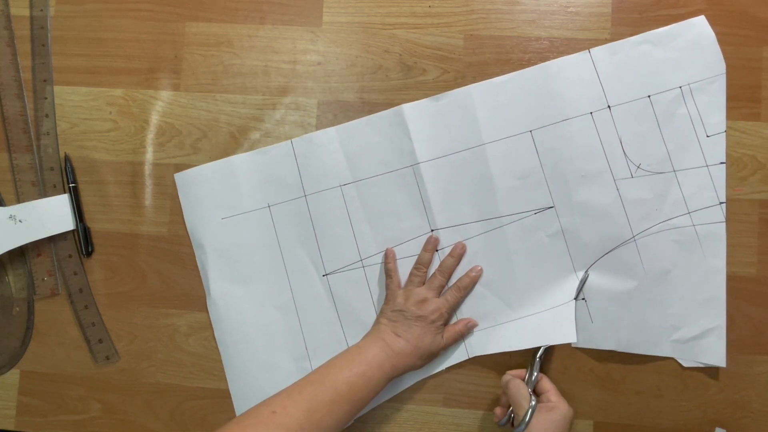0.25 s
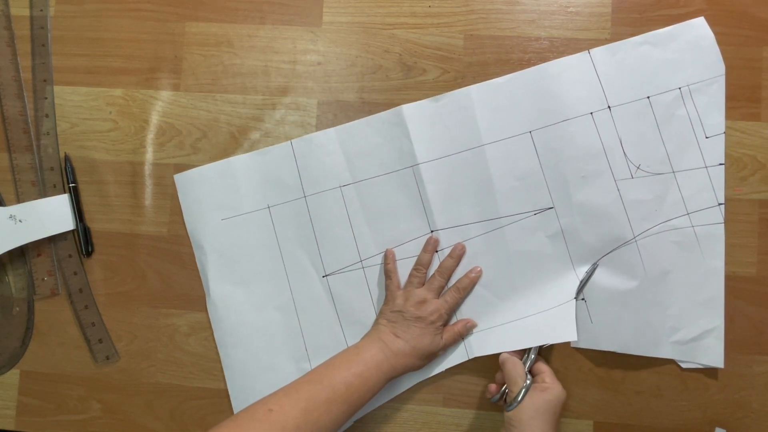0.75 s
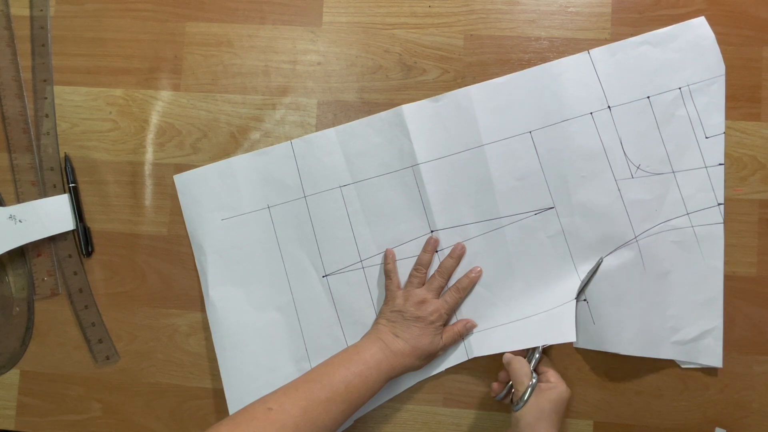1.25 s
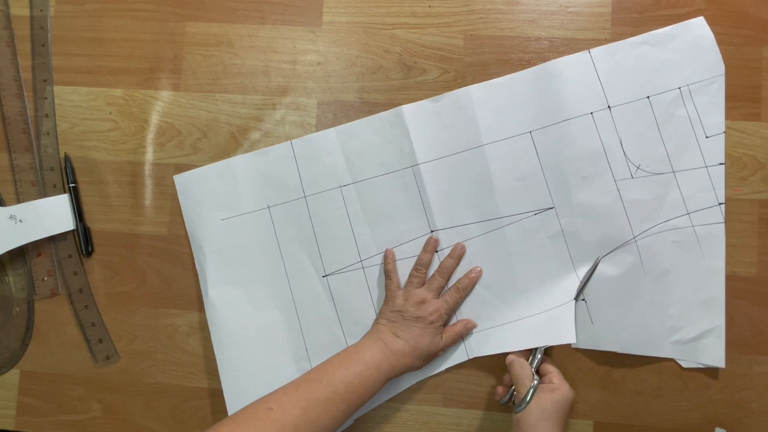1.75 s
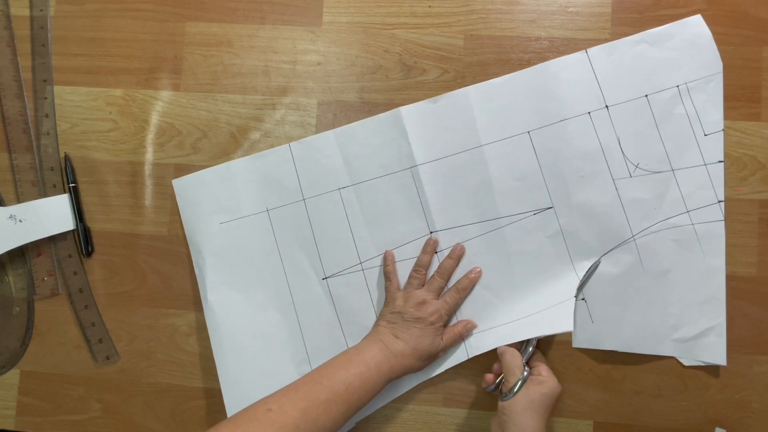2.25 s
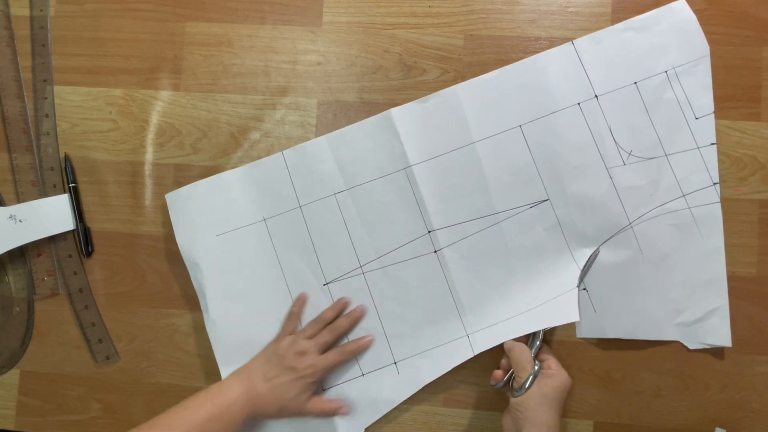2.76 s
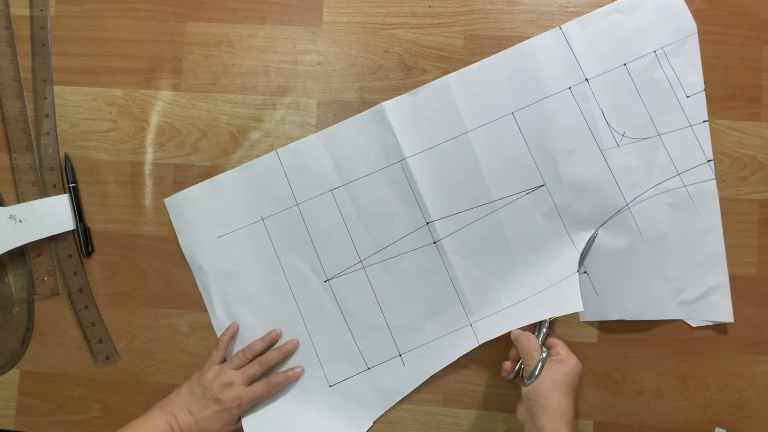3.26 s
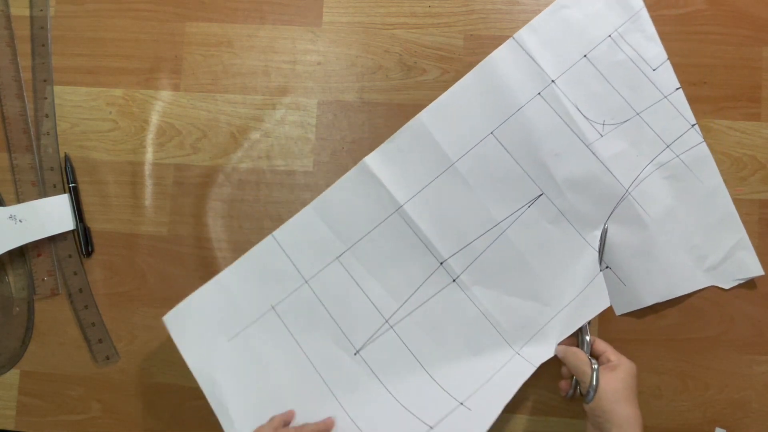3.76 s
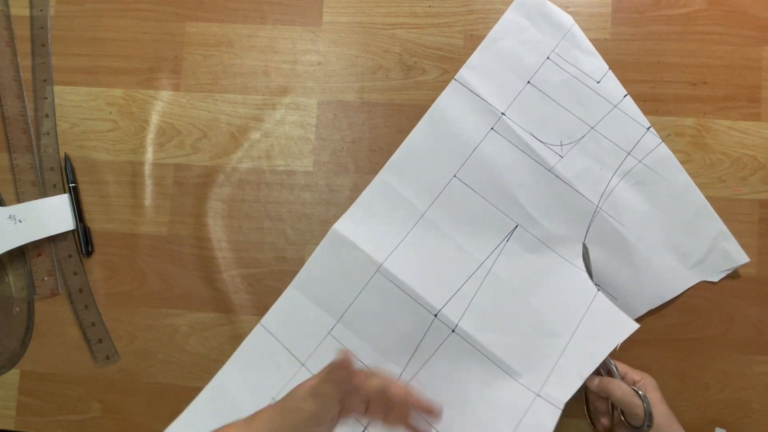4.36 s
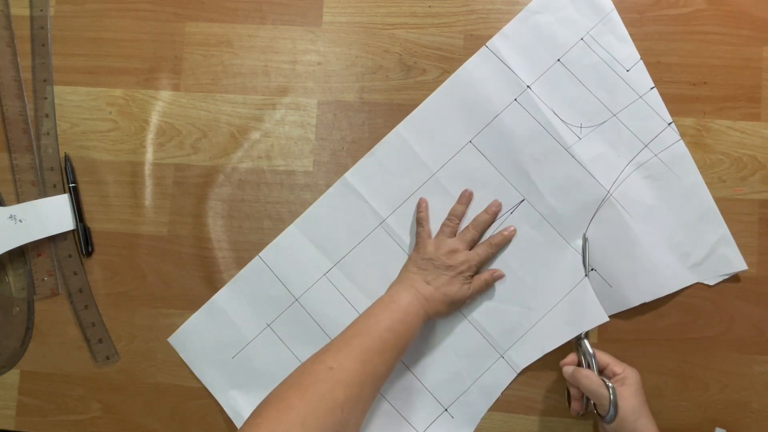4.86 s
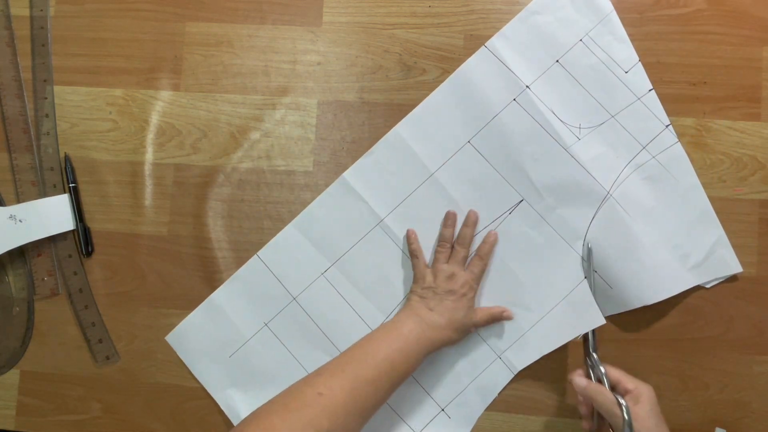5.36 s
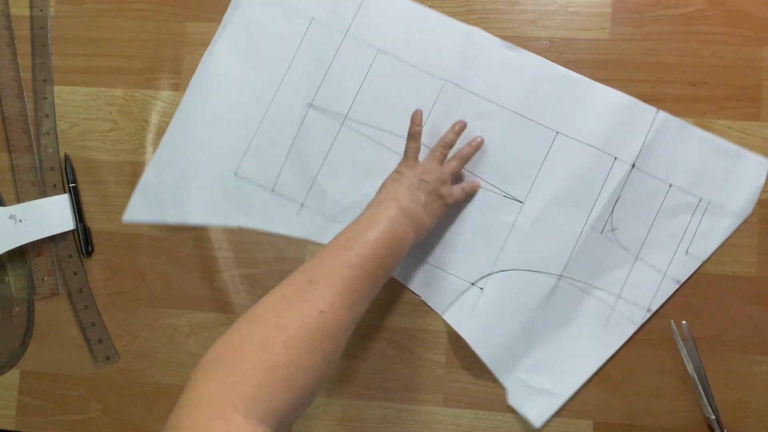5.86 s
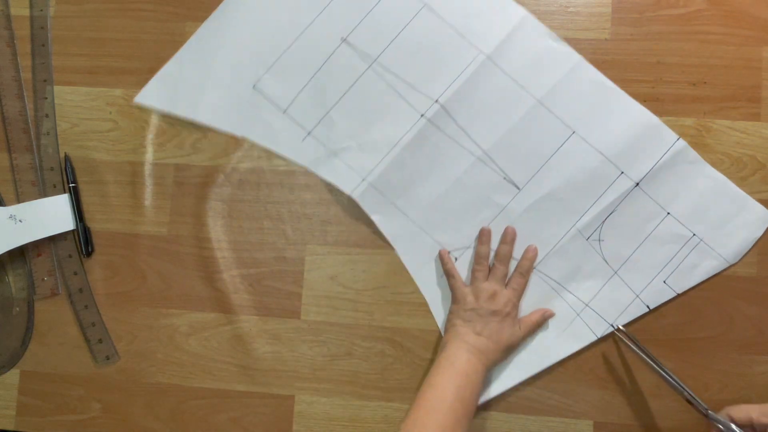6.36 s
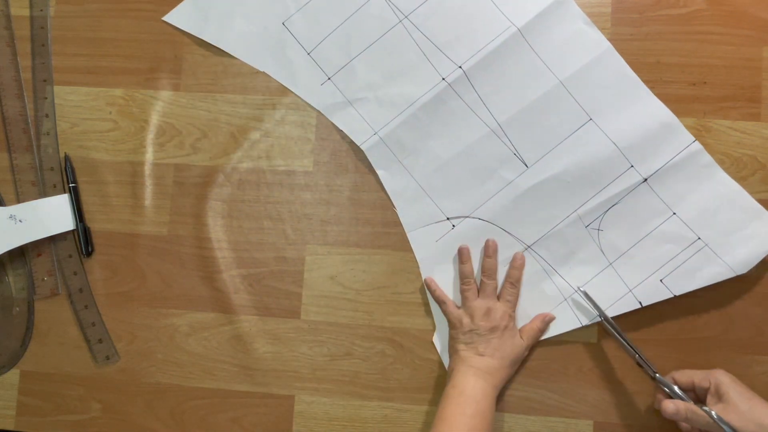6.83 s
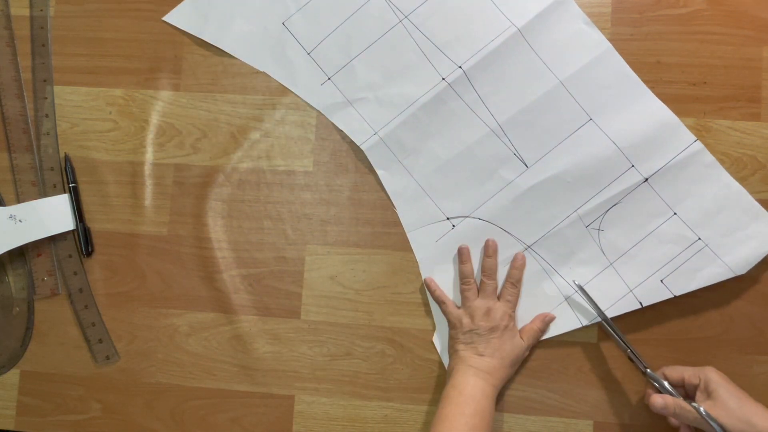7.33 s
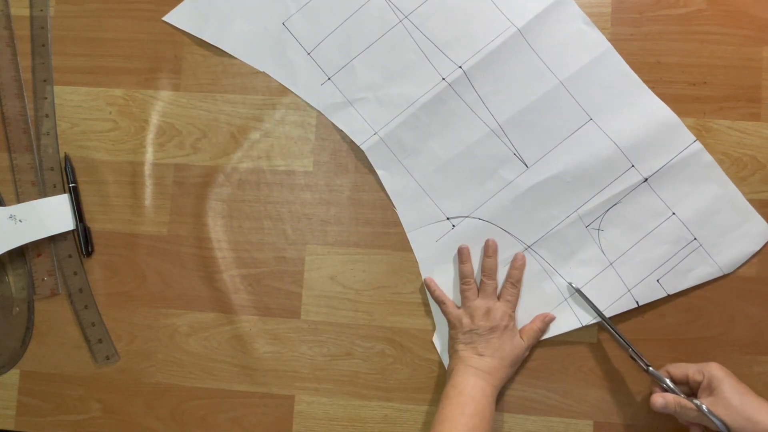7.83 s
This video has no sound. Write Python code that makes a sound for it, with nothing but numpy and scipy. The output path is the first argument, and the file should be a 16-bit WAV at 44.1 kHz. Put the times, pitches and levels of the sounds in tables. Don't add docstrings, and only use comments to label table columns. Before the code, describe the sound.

Small scissor snips, sharp creasing snaps and sliding hiss of big paper on wooden boards, a few soft palm pats, low indoor hum.

```python
import sys
import numpy as np
from scipy import signal
from scipy.fft import rfft, irfft, next_fast_len
from scipy.io import wavfile
from scipy.ndimage import map_coordinates

SR = 44100
rng = np.random.default_rng(int(sys.argv[2]) if len(sys.argv) > 2 else 0)


def amplitude_ratio(level_db):
    exponent = np.asarray(level_db, float) / 20
    return 10 ** exponent


def store_wav(level_fs):
    pcm = np.round(np.clip(np.atleast_2d(level_fs), -1, 1) * 32767)
    wavfile.write(sys.argv[1], SR, pcm.T.astype(np.int16))


N = 356769


def unit(x):
    return x / np.sqrt(np.mean(x ** 2) + 1e-20)


def along(points, hz):
    f, *cols = np.transpose(points)
    return np.squeeze([np.interp(np.log(hz + 1), np.log(f + 1), c) for c in cols])


def curves(rows):
    s, *cols = np.transpose(rows)
    return [np.interp(np.arange(N) / SR, s, c) for c in cols]


def wobble(rate):
    knots = rng.standard_normal(int(N * rate / SR) + 4)
    return map_coordinates(knots, [np.arange(N) * rate / SR])


def filtered(x, response):
    m = next_fast_len(x.shape[-1] + 4096)
    spectrum = rfft(x, m) * response(np.fft.rfftfreq(m, 1 / SR))
    return irfft(spectrum, m)[..., :x.shape[-1]]


def coloured(points):
    return lambda hz: amplitude_ratio(along(points, hz))


def ringing(modes):
    def response(f):
        total = 0
        for k, (centre, width, db) in enumerate(modes):
            mode = 1j * f * width / (centre * centre - f * f + 1j * f * width)
            total = total + (-1) ** k * amplitude_ratio(db) * mode
        return total
    return response


def steep(modes):
    return lambda f: ringing(modes)(f) ** 2


def grit(response, grain_db=0, rate=1):
    grain = amplitude_ratio(grain_db * wobble(rate))
    return unit(filtered(rng.standard_normal((2, N)) * grain, response))


def burst(t60, grain_db, rise=.0005, hold=0, size=SR // 10):
    t = np.arange(size) / SR
    grain = np.repeat(rng.standard_normal(len(t) // 30 + 1), 30)[:len(t)]
    decay = amplitude_ratio(-60 * np.maximum(t - rise - hold, 0) / max(t60, .003))
    swell = np.minimum(t / max(rise, 1e-4), 1) * decay
    return rng.standard_normal((2, len(t))) * amplitude_ratio(grain_db * grain) * swell


def add(out, s, x, db):
    out[:, round(s * SR):][:, :x.shape[1]] += x * amplitude_ratio(db) / np.max(np.abs(x[0]))


def swells(rows, rest_db):
    roundness = 1.6
    t = np.arange(0, N + 64, 64) / SR
    power = amplitude_ratio(2 * rest_db)
    for s, db, rise, fall in rows:
        distance = np.maximum((s - t) / max(rise, .005), (t - s) / max(fall, .005))
        power = power + amplitude_ratio(2 * (db - 20 * distance ** roundness))
    return np.interp(np.arange(N) / SR, t, np.sqrt(power))


# t/s, peak level/dB, board knock level/dB
BITES = [(0.0386, -41.5, -50.5), (0.0704, -46.5, -49), (0.635, -45, -52), (0.668, -44, -50),
         (0.6725, -39, -48), (0.6828, -53, -52), (0.7067, -43, -48), (0.7315, -37.5, -54),
         (0.8005, -45.5, -54), (0.8465, -39, -48), (1.812, -58, -74), (1.914, -55, -58),
         (1.9235, -31, -47.5), (1.9334, -56, -44.5), (2.0358, -51, -46), (2.066, -52, -58),
         (2.1844, -46, -60), (2.2584, -40, -50), (2.317, -51, -56), (6.214, -45, -55), (7.522, -48.5, -51),
         (7.603, -49.5, -44.5), (7.6864, -43, -47), (7.7245, -49.5, -45), (7.7516, -51, -45),
         (7.7902, -44, -53), (7.8317, -44.5, -43.5), (7.874, -40, -47), (7.9344, -41, -40),
         (7.9994, -49.5, -49.5)]
# f/Hz, width/Hz, level/dB
STEEL = [(1440, 97, -2), (2690, 600, -1.5), (4940, 870, -1), (6370, 1800, -0.5), (9500, 9000, -6),
         (14000, 13500, -7.5)]
# f/Hz, width/Hz, level/dB
BOARD = [(259.5, 53, -2.5), (336, 37, 1), (383, 34.6, -1.5), (659, 42, -8.5), (880, 94, -13.5),
         (1290, 74, -14.5)]


def bites():
    out = np.zeros((2, N + SR))
    for s, db, knock_db in BITES:
        cut = burst(0.021, grain_db=3.0, rise=0.0011, hold=.005)
        add(out, s - .0005, filtered(cut, ringing(STEEL)), db + 1.0)
        knock = burst(0.019, grain_db=6.5)
        add(out, s, filtered(knock, ringing(BOARD[:4])), knock_db + 5)
    return out[:, :N]


# t/s, peak level/dB, panel f/Hz, bright share level/dB
TURN_SNAPS = [(2.192, -44, 3500, -15), (2.21, -45, 1100, -1), (2.593, -44.5, 1430, -26),
              (2.682, -35.5, 1820, -28), (2.721, -36, 1480, -22), (2.728, -32, 2160, -27),
              (2.797, -33.5, 1900, -16), (2.8085, -30, 1980, -7.5), (2.919, -43, 2530, -25),
              (3.167, -35, 2190, -18), (3.185, -27.5, 2520, -10), (3.305, -29.5, 2140, -10),
              (3.335, -40, 2000, -16), (3.443, -33, 2110, -5.5), (3.461, -33, 2580, -2),
              (3.511, -35, 832, -20), (3.542, -39, 2250, -18), (3.56, -41, 1810, -15),
              (3.58, -43, 1690, -17), (3.607, -36.5, 1400, -9), (3.643, -38, 1670, -22),
              (3.723, -34, 1290, -11.5), (3.842, -38, 1130, -23), (3.893, -41, 1570, -18.5)]
# t/s, peak level/dB, panel f/Hz, bright level/dB
LIFT_SNAPS = [(3.989, -42.5, 855, -13), (4.023, -39, 1630, -19), (4.034, -38, 1710, -8),
              (4.045, -22, 1600, -8.5), (4.198, -41, 2020, -26), (4.218, -32, 2060, -33),
              (4.24, -31, 1060, -33), (4.309, -33, 2000, -24), (4.346, -42, 810, -24),
              (4.389, -33, 1200, -23), (4.585, -47, 1940, -18), (4.597, -33, 2460, -27),
              (4.601, -35, 1300, -27), (4.611, -25, 2280, -24), (4.619, -20, 2100, -7.5),
              (4.6235, -24, 2200, -15), (4.63, -27, 2500, -31), (4.95, -48, 1630, -2),
              (5.158, -47.5, 2130, -5), (5.254, -39.5, 1570, -18), (5.377, -31, 1900, -24),
              (5.384, -32, 1980, -20), (5.39, -27.5, 2560, -9), (6.213, -41, 1800, -8)]
USUAL_SNAP_DB = -35
# f/Hz, level/dB per Hz
BRIGHT = [(1500, -33), (3500, 6), (5500, 13.5), (7500, 1), (12000, -18), (16000, -29)]


def snaps():
    out = np.zeros((2, N + SR))
    rise = .0018
    for s, db, hz, bright_db in TURN_SNAPS + LIFT_SNAPS:
        t60 = .029 + .0004 * (db - USUAL_SNAP_DB)
        panel = ringing([(hz, 0.4 * hz, 0), (1.43 * hz, 1.22 * hz, -6), (0.57 * hz, 0.45 * hz, -8.5)])
        add(out, s, filtered(burst(t60, grain_db=2.0, rise=rise), panel), db + 1.0)
        spray = burst(0.58 * t60, grain_db=-1.0, rise=rise)
        add(out, s, filtered(spray, coloured(BRIGHT)), db + bright_db + 3)
    return out[:, :N]


def damped_ring(hz, t60):
    t = np.arange(SR // 10) / SR
    overtone = amplitude_ratio(-7 - 60 * t / t60) * np.sin(2 * np.pi * 1.37 * hz * t)
    ring = np.sin(2 * np.pi * hz * t) + overtone
    onset = 1 - np.exp(-t / .0007)
    return (ring * onset * amplitude_ratio(-60 * t / t60))[None]


# t/s, peak level/dB, f/Hz
TICKS = [(0.039, -51, 5170), (0.673, -47, 1720), (0.731, -47, 5340), (0.732, -51, 3960), (0.803, -51, 5340),
         (0.852, -45, 5000), (1.925, -40, 4650), (2.194, -51, 4650), (2.197, -50, 3450), (2.209, -46, 2760),
         (2.225, -47, 2760), (2.511, -51, 2410), (2.524, -47, 2580), (2.683, -48, 4130), (2.81, -35, 5340),
         (3.169, -48, 5860), (3.383, -41, 2240), (3.388, -49, 4480), (3.461, -37, 2760), (3.479, -45, 3620),
         (3.511, -38, 2930), (3.543, -50, 4480), (3.644, -42, 2580), (3.722, -50, 5680), (4.056, -33, 690),
         (4.175, -51, 5170), (4.24, -38, 2580), (4.387, -49, 3100), (4.485, -51, 4820), (4.485, -49, 2580),
         (5.378, -30, 1890), (5.394, -38, 5170), (5.653, -45, 2240), (5.663, -39, 5170), (5.67, -39, 5000),
         (5.701, -39, 6030), (5.799, -41, 4310), (5.823, -42, 5860), (6.213, -43, 3960), (6.229, -50, 3960),
         (6.231, -44, 1720), (6.393, -48, 1550), (6.742, -51, 1890), (7.79, -50, 2070), (7.838, -50, 2580),
         (0.6715, -46, 1100), (0.706, -50, 1000), (0.7315, -49, 1300), (0.846, -48, 1100),
          (0.856, -50, 1000), (1.9255, -42, 900), (3.56, -39, 1800), (3.579, -42, 1200), (3.587, -41, 1700),
          (3.598, -41, 1900), (3.656, -43, 1500), (3.684, -45, 1300), (4.217, -35, 1300),
          (4.221, -34, 2200), (4.2235, -37, 1000), (4.289, -42, 1320), (4.308, -38, 3300),
          (4.312, -37, 1500), (4.3145, -39, 2700), (4.388, -39, 2000), (4.392, -39, 900),
          (4.597, -36, 2500), (4.631, -28, 2240), (4.645, -36, 2300), (4.653, -39, 1550),
          (5.164, -51, 5300), (7.934, -45, 1300), (7.935, -47, 3500)]


def ticks():
    out = np.zeros((2, N + SR))
    for s, db, hz in TICKS:
        t60 = .014 * np.sqrt(1800 / hz)
        add(out[:1], s, damped_ring(hz, t60), db)
    return out[:, :N]


# t/s, peak level/dB, f/Hz, t60/s
RINGS = [(0.639, -48, 1000, .02), (1.932, -44, 1450, .05), (2.039, -47, 900, .03), (7.527, -50, 1300, .04),
         (7.603, -48, 1300, .05), (7.686, -49, 1300, .04), (7.727, -49, 900, .05), (7.789, -50, 1150, .03),
         (7.876, -43, 1280, .05), (7.893, -46, 900, .04), (7.945, -43, 930, .1), (7.968, -48, 860, .06),
         (8.003, -50, 800, .04)]


def board_rings():
    out = np.zeros((2, N + SR))
    for s, db, hz, t60 in RINGS:
        add(out[:1], s, damped_ring(hz, t60), db)
    return out[:, :N]


# t/s, peak level/dB, t60/s
PATS = [
    (2.781, -44, 0.18),
    (4.659, -45.5, 0.06),
    (6.295, -34, 0.055),
    (6.329, -39.5, 0.086),
    (6.38, -37, 0.077),
    (6.419, -47, 0.07),
    (6.485, -39, 0.12),
    (6.519, -42, 0.14),
]
# f/Hz, width/Hz, level/dB
PALM = [(199, 51, -2), (312, 69, 3.5), (495, 600, -3), (800, 600, -6.5)]


def pats():
    out = np.zeros((2, N + SR))
    soft = lambda f: ringing(PALM)(f) / (1 + 1j * f / 900) ** 2
    for s, db, t60 in PATS:
        add(out, s, filtered(burst(t60, grain_db=0.5, size=SR // 4), soft), db)
    puff = burst(.12, grain_db=0, rise=0.01, size=SR // 4)
    add(out, 4.63, filtered(puff, ringing([(45, 44, 0)])), -40)
    return out[:, :N]


# t/s fastest, level/dB, last 20 dB rise/s, 20 dB fall/s
SLIDES = [(0.05, -79.0, 0.12, 0.16), (0.35, -61.5, 0.17, 0.16), (1.16, -68.5, 0.1, 0.11),
          (2.22, -67.0, 0.06, 0.09), (2.59, -67.5, 0.48, 0.26), (2.73, -61.5, 0.1, 0.16),
          (2.84, -60.5, 0.15, 0.11), (2.96, -63.0, 0.08, 0.22), (3.19, -58.5, 0.05, 0.07),
          (3.34, -60.5, 0.13, 0.17), (3.45, -61.5, 0.2, 0.06), (3.61, -68.5, 0.35, 0.37),
          (4.03, -62.0, 0.41, 0.12), (4.17, -58.5, 0.05, 0.13), (4.37, -70.5, 0.05, 0.17),
          (4.48, -63.0, 0.09, 0.22), (4.62, -57.0, 0.04, 0.18), (4.98, -70.0, 0.17, 0.09),
          (5.35, -67.5, 0.55, 0.26), (5.56, -59.0, 0.38, 0.28), (5.7, -52.5, 0.25, 0.3),
          (5.93, -59.5, 0.38, 0.13), (6.24, -70.5, 0.02, 0.13), (6.4, -55.0, 0.15, 0.17),
          (6.73, -69.0, 0.1, 0.15), (7.52, -79.0, 0.03, 0.1), (7.86, -85.0, 0.38, 0.3)]
# f/Hz, level/dB per Hz
SLIDE = [(600, -39), (1400, -13), (2200, -6), (3000, -4), (4000, -4), (6000, 0), (7500, -6), (10000, -7),
         (13000, -16), (15600, -12)]


def slide():
    skids = [(s, db - 38, .012, .1) for s, db, _ in BITES]
    hiss = grit(coloured(SLIDE), grain_db=1.0, rate=470)
    return swells(SLIDES + skids, -87.5) * amplitude_ratio(9 + 1.5 * wobble(25)) * hiss


def crackle(rate, centre_hz, spread, cycles, size_db):
    when, place, pitch, size = rng.random((int(rate) * N // SR, 4)).T
    hz = centre_hz * np.exp(spread * (2 * pitch - 1))[:, None]
    t = np.arange(SR // 100) / SR
    peak = amplitude_ratio(-size_db * np.log(1 - np.minimum(size, .96)))[:, None]
    rings = peak * np.sin(2 * np.pi * hz * t) * np.exp(-t * hz / cycles)
    at = ((when * N).astype(int)[:, None] + np.arange(len(t))).ravel()
    sides = np.cos(2 * np.pi * place), np.sin(2 * np.pi * place)
    return unit(np.array([np.bincount(at, (rings * side[:, None]).ravel(), N + SR)[:N] for side in sides]))


# f/Hz, level/dB per Hz
FLEX = [(250, -17), (600, 3.5), (1000, -3.5), (1600, -4), (2200, 0.5), (3000, -2), (4500, -10.5),
        (8000, -21), (16000, -75)]


def rustling():
    creases = crackle(1300, centre_hz=1600, spread=0.79, cycles=2.2, size_db=2.5)
    return amplitude_ratio(-2.5) * grit(coloured(FLEX), grain_db=1.0, rate=500) + amplitude_ratio(-3.5) * creases


# t/s tightest, level/dB, last 20 dB rise/s, 20 dB fall/s
BENDS = [(0, -57.0, 0.1, 0.13), (3.37, -49.5, 0.09, 0.39), (3.51, -46.0, 0.28, 0.39),
         (3.61, -46.5, 0.15, 0.13), (3.84, -49.0, 0.05, 0.27), (4.05, -41, 0.1, 0.09),
         (4.23, -46, 0.14, 0.06), (4.3, -48.0, 0.06, 0.06), (4.39, -48.0, 0.05, 0.07),
         (4.63, -45.5, 0.1, 0.06), (6.37, -65.5, 0.34, 0.51), (7.81, -59.0, 1.47, 0.81)]


def flex(rustle):
    hits = TURN_SNAPS + LIFT_SNAPS + BITES
    shakes = [(s, -56 + .45 * (db - USUAL_SNAP_DB), .012, .08) for s, db, *_ in hits]
    return swells(BENDS + shakes, -68) * amplitude_ratio(-3.0 + 1.9 * wobble(60)) * rustle


# t/s widest, level/dB, last 20 dB rise/s, 20 dB fall/s
FLAPS = [
    (0.35, -66, .1, .1),
    (2.8, -56, .03, .08),
    (3.42, -57, .06, .05),
    (3.485, -55, .04, .03),
    (4.09, -52, .05, .12),
    (4.2, -55, .08, .1),
    (4.33, -54, .06, .08),
    (4.41, -55, .04, .1),
    (4.53, -60, .06, .06),
]
# f/Hz, width/Hz, level/dB
LOOSE = [(800, 450, 0)]


def flap(rustle):
    return swells(FLAPS, -87) * unit(filtered(rustle, steep(LOOSE)))


# t/s fastest, level/dB, last 20 dB rise/s, 20 dB fall/s
FIZZES = [
    (1.927, -58, .005, .03),
    (2.75, -68, .4, .4),
    (5.75, -69, .4, .3),
    (6.4, -72, .2, .2),
]
# f/Hz, width/Hz, level/dB
DRY = [(15200, 1200, 0)]


def fizz(rustle):
    response = lambda f: steep(DRY)(f) / coloured(FLEX)(f)
    return swells(FIZZES, -105) * unit(filtered(rustle, response))


# t/s fastest, level/dB, last 20 dB rise/s, 20 dB fall/s
BRUSHES = [(0.36, -65, 0.14, 0.14), (1.15, -61.0, 0.08, 0.13), (2.23, -58.0, 0.08, 0.06),
           (2.4, -64.0, 0.22, 0.24), (2.56, -63.0, 0.15, 0.2), (2.97, -59.5, 0.15, 0.23),
           (3.31, -60.0, 0.13, 0.29), (4.48, -62.0, 0.14, 0.25), (4.98, -69.5, 0.15, 0.19),
           (5.23, -68.0, 0.27, 0.21), (5.49, -59.5, 0.43, 0.35), (6.39, -67.5, 0.18, 0.28),
           (6.74, -65.5, 0.11, 0.13)]
# f/Hz, width/Hz, level/dB
TAUT = [(1700, 950, 0), (2700, 1200, 0.5)]
# t/s fastest, level/dB, last 20 dB rise/s, 20 dB fall/s
DRAGS = [(0.33, -64, .12, .1), (0.39, -61, .08, .1), (2.87, -66, .05, .08), (3.87, -62, .1, .1),
         (3.925, -58, .05, .04), (3.97, -58, .03, .06), (3.6, -60, .08, .1), (6.23, -60, .03, .06),
         (6.39, -65, .05, .05), (6.75, -65, .04, .06), (6.58, -68, .04, .04)]
# f/Hz, width/Hz, level/dB
SLACK = [(1500, 1100, 0)]
# t/s fastest, level/dB, last 20 dB rise/s, 20 dB fall/s
SCRAPES = [
    (2.52, -62, .04, .05),
    (2.875, -57, .04, .04),
    (2.925, -59, .03, .03),
    (2.965, -57, .05, .04),
    (3.39, -61, .03, .08),
    (4.18, -59, .06, .04),
]
# f/Hz, width/Hz, level/dB
TIGHT = [(2800, 1100, 0)]


def brush():
    uneven = amplitude_ratio(1.5 * wobble(30))
    rub = grit(steep(TAUT), grain_db=2.5, rate=300)
    taut = swells(BRUSHES, -87) * rub
    slack = swells(DRAGS, -87) * unit(filtered(rub, steep(SLACK)))
    tight = swells(SCRAPES, -87) * unit(filtered(rub, steep(TIGHT)))
    return uneven * (taut + slack + tight)


# t/s, level/dB, last 20 dB rise/s, 20 dB fall/s
WHISKS = [
    (5.68, -51, .06, .1),
    (5.82, -53, .12, .12),
    (6.39, -58, .15, .15),
    (2.4, -62, .15, .15),
]
# f/Hz, width/Hz, level/dB
EDGE = [(5200, 2200, 0), (3500, 900, -6), (7600, 1500, -8)]


def whisk():
    return swells(WHISKS, -87) * grit(steep(EDGE), grain_db=2.5, rate=200)


# t/s hardest, level/dB, last 20 dB rise/s, 20 dB fall/s
PRESSES = [
    (0, -48, .1, .22),
    (0.7, -63, 1.2, .6),
    (2.05, -63, 1.5, 1.5),
    (2.75, -55.5, .2, .8),
    (3.49, -56, .9, .6),
    (4.21, -54.5, .7, .65),
    (5.6, -61, 1.2, .9),
    (6.44, -54, .9, .3),
    (7.75, -52.5, .35, .8),
]


def press():
    return swells(PRESSES, -68) * amplitude_ratio(-2.0) * grit(ringing(BOARD), grain_db=3.5, rate=40)


def hand():
    rustle = rustling()
    paper = flex(rustle) + flap(rustle) + fizz(rustle)
    return slide() + paper + brush() + whisk() + press()


# f/Hz, t60/s
WALLS = [(200, 0.35), (2000, 0.21), (10000, 0.085)]


def walls(x):
    out, step = np.zeros((2, N + 2 * SR)), SR // 4
    for start in range(0, N, step):
        hz, t, z = signal.stft(rng.standard_normal((2, SR // 3)), SR, nperseg=256)
        decay = amplitude_ratio(-60 * t / along(WALLS, hz)[:, None])
        tail = signal.istft(z * decay, SR, nperseg=256)[1]
        echo = signal.fftconvolve(x[:, start:start + step], tail / np.linalg.norm(tail[0]), axes=1)
        out[:, start + SR // 200:][:, :echo.shape[1]] += echo
    return out[:, :N]


# t/s, rumble level/dB, drone level/dB
ROOM = [(0.0, -55, -57), (0.74, -80, -50.5), (1.04, -58, -71), (1.28, -64, -53), (2.23, -61, -59),
        (2.46, -54.5, -63), (2.9, -51, -51), (3.2, -48, -50), (3.42, -49, -54), (3.65, -49, -50),
        (3.92, -49, -54.5), (4.2, -50, -49), (4.87, -54, -49), (5.25, -55, -55), (5.55, -57, -49),
        (5.85, -57, -50.5), (6.15, -55, -47), (6.6, -55, -53), (7.86, -52, -53.5), (8.09, -53, -44)]
# f/Hz, rms level/dB
MAINS = [(100, -63.5), (150, -63), (200, -67), (249, -67.5), (400, -72.5)]
# f/Hz, width/Hz, level/dB
RUMBLE = [(57.2, 14.4, 5.5), (98, 27, -3)]
# f/Hz, width/Hz, level/dB
DRONE = [(146, 23.6, 0)]
# f/Hz, level/dB per Hz
AIR = [(18, -60), (26, 5), (170, -3), (350, -15), (500, -9), (1000, -12.5), (2000, -19.5), (3000, -18.5),
       (4000, -25), (6000, -27), (7100, -24.5), (10000, -62), (12500, -66), (13300, -95)]


def hum():
    rumble_db, drone_db = curves(ROOM)
    t = np.arange(N) / SR
    mains = 0
    for hz, db in MAINS:
        level = amplitude_ratio(db + 2.5 + 2.2 * wobble(2.91))
        mains = mains + level * np.sin(2 * np.pi * hz * t + 0.41 * wobble(3))
    boom = amplitude_ratio(rumble_db - 1.1) * grit(steep(RUMBLE)) + amplitude_ratio(drone_db - 2.0) * grit(steep(DRONE))
    air = amplitude_ratio(-55.5 + 0.2 * wobble(2.03)) * grit(coloured(AIR))
    return mains * [[1], [0]] + boom + air


# f/Hz, left lead/rad, likeness 0-1
TREBLE = [(6850, 2.9, .89), (8050, 3.4, .91), (8800, 5.8, .75), (9900, 6.2, .95), (12300, 6.3, .97),
          (13000, 9.2, .9), (15100, 9.5, .97), (15400, 10.7, .7)]
# f/Hz, left-right level/dB
LEAN = [(60, 0), (170, -3), (400, -4.5), (700, -2), (1500, 1), (3000, 2), (5000, -1), (6500, 0)]


def ports(pair, table):
    def left_right(hz):
        lead, alike = along(table + TREBLE, hz)
        turn = np.arccos(np.clip(alike, 0, 1)) / 2
        port = np.exp(.5j * lead) * amplitude_ratio(along(LEAN, hz) / 2)
        shared, own = np.cos(turn), np.sin(turn)
        return np.array([[shared * port, own * port], [shared / port, -own / port]])
    return filtered(pair[None], left_right).sum(axis=1)


# f/Hz, left lead/rad, likeness 0-1
NEAR = [(344, 0.39, .94), (520, 0.87, .65), (700, 1.4, 0.66), (1060, 0.73, 0.09), (1500, 0.019, 0.82),
        (2170, 0.47, 0.97), (2860, 1, 0.42), (4020, 0.7, .6), (5400, 0.86, 0.56), (6140, 1.9, 0)]
# f/Hz, left lead/rad, likeness 0-1
FAR = [(60, 0, .995), (177, 0, 0.98), (360, 1, 1), (523, 2, 0.72), (720, 2, 0.57), (1080, 2.5, 0.47),
       (1560, 1.5, .4), (2150, 1.5, 0.14), (2920, 2.5, 0.51), (3970, 3, 0.28), (5070, 0.2, 0.2),
       (5650, 1.1, 1)]


def scene():
    hits = bites() + snaps() + ticks() + board_rings() + pats()
    near = hits + hand() + amplitude_ratio(-9.5) * walls(hits)
    return ports(near, NEAR) + ports(hum(), FAR)


def roll_off(x):
    return signal.sosfilt(signal.butter(12, 17070, fs=SR, output="sos"), x)


def record(dry):
    mix = filtered(dry, lambda hz: hz < 15830)
    return roll_off(mix)


dry = scene()
out = record(dry)
store_wav(out)
```